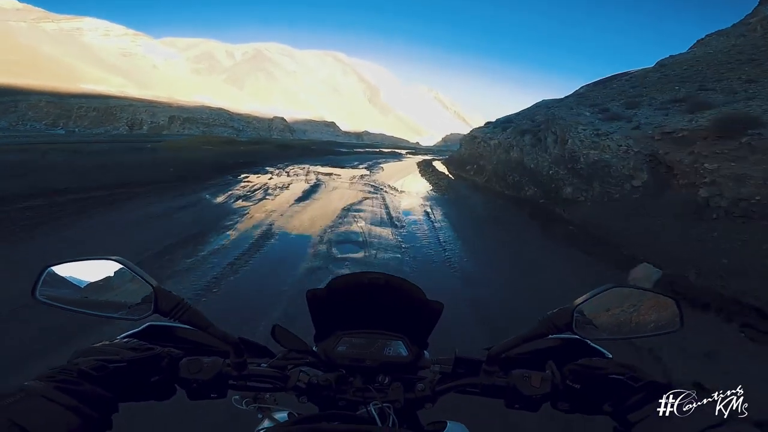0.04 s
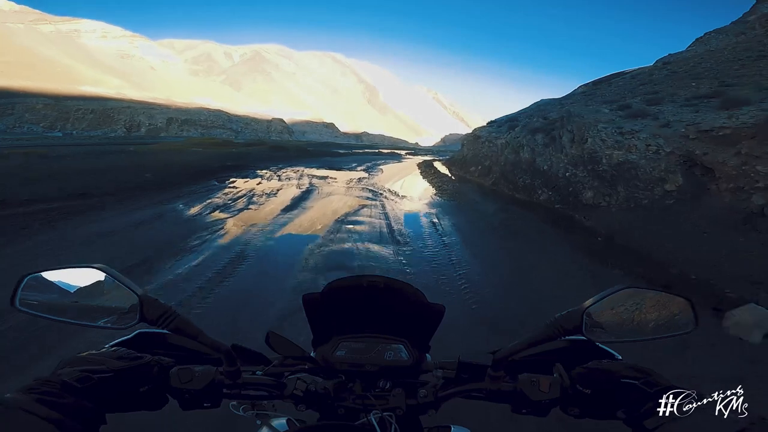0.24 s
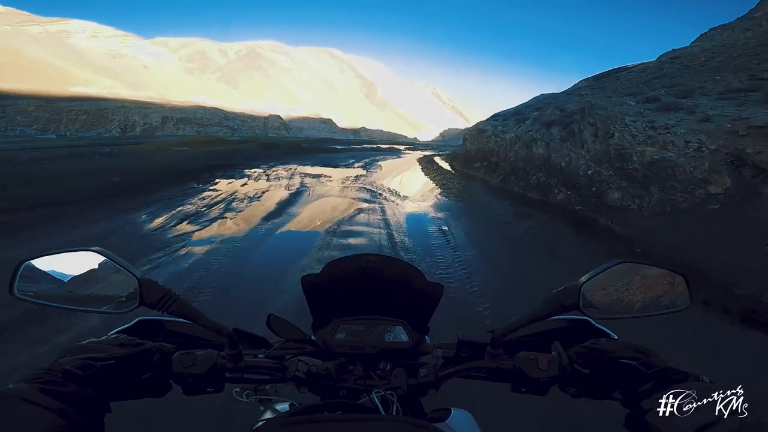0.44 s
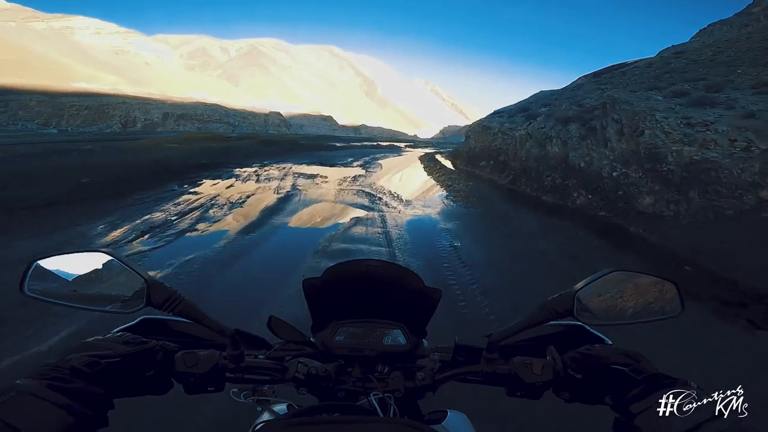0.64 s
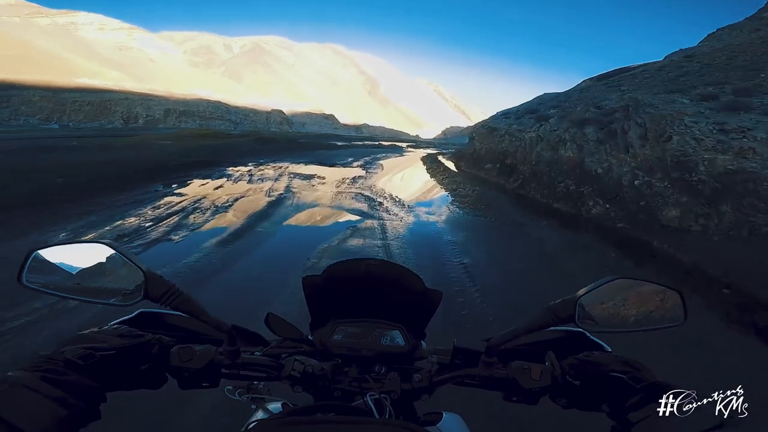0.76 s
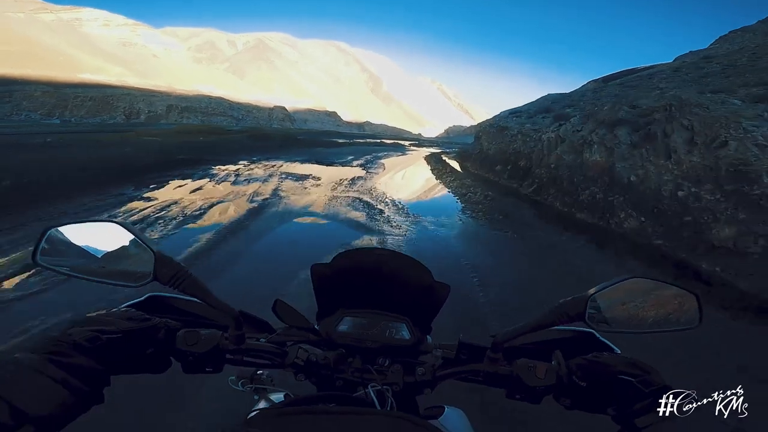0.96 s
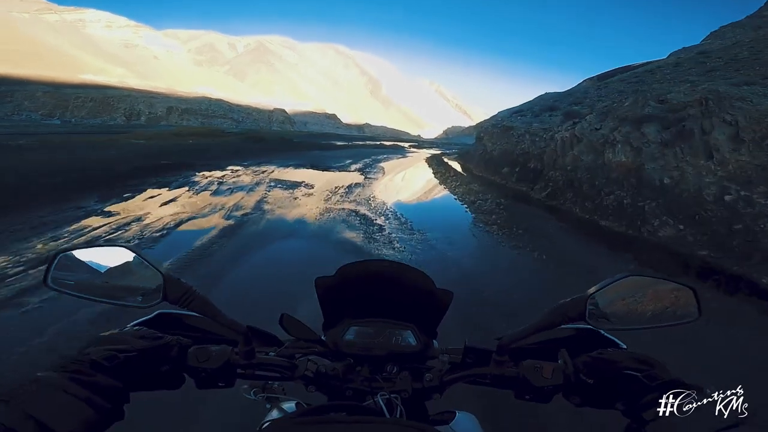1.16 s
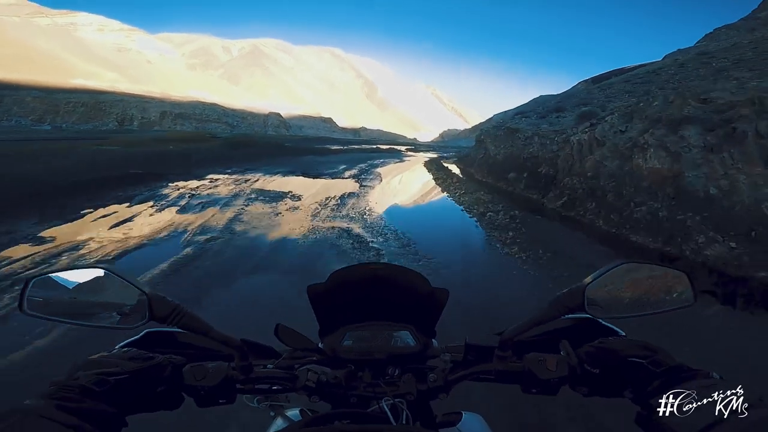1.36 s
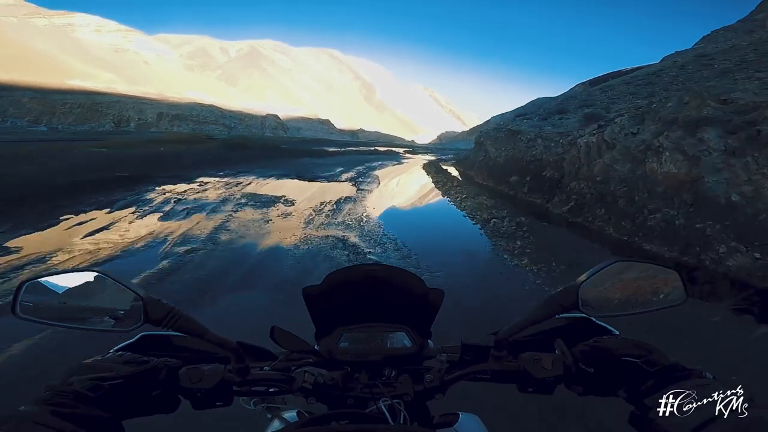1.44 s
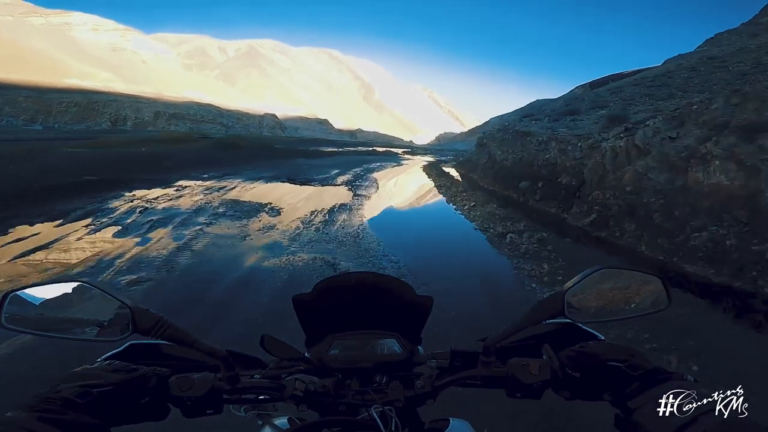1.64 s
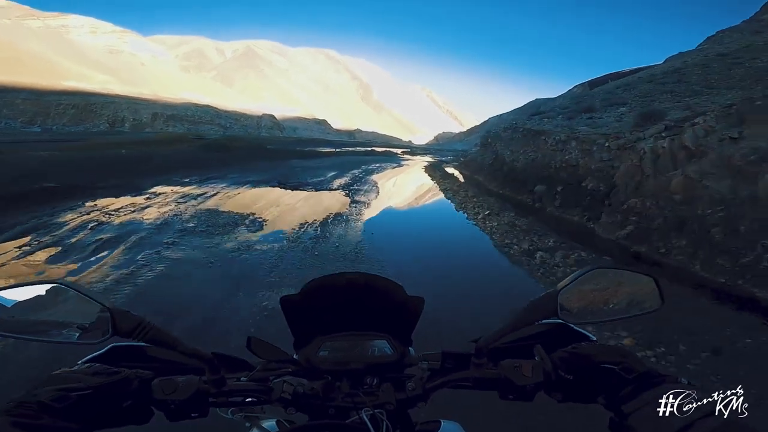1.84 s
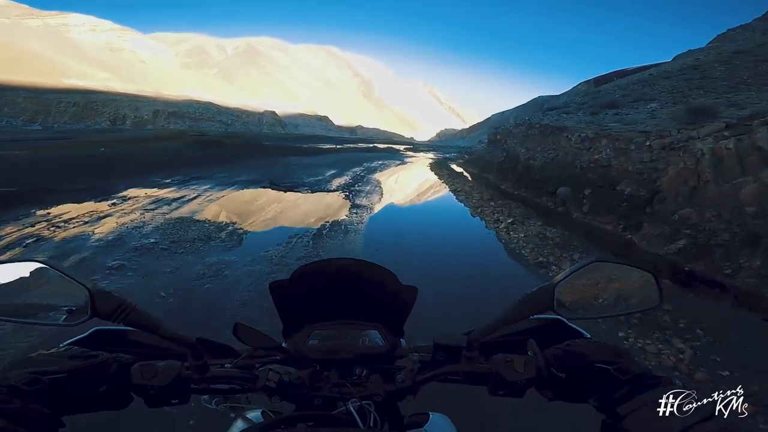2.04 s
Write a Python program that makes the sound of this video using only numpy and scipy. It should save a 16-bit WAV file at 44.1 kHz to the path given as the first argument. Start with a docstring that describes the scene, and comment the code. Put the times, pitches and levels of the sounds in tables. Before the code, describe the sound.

Low, throbbing motorcycle engine runs throughout, slightly stumbling early and then pulling harder; tyres swish and spatter on a wet track, bodywork clunks, and a loose part rattles at the end, recorded close on the bike outdoors.

```python
"""Throughout runs the low, muffled beat of a single-cylinder motorcycle at low revs, heard from the rider's seat.
It rolls over a wet, slushy track: each cycle is an exhaust push, an intake gulp, a gas rush and clatter.
These are harmonics, swelling noise and struck modes; a faint whine of wavering sines sits on top.
Bands of noise swish as tyres in slush, small rings spatter, and the bodywork hums and clunks as sines and modes.
Near the end a loose part knocks and rattles over a bump; wind rumble and hiss lie behind it all."""
import sys
import numpy as np
from scipy import signal
from scipy.fft import rfft, irfft
from scipy.io import wavfile

SR = 44100
rng = np.random.default_rng(int(sys.argv[2]) if len(sys.argv) > 2 else 0)


def transcribe(signal):
    """Save signal, clipped to [-1, 1], as a 16-bit WAV file at the path in sys.argv[1]."""
    frames = np.atleast_2d(signal).T
    limited = np.clip(frames, -1, 1)
    pcm = np.round(limited * 32767).astype(np.int16)
    wavfile.write(sys.argv[1], SR, pcm)


N = 92962
T = np.arange(N) / SR


def from_db(db):
    """Decibels to gain."""
    return 10 ** (np.asarray(db) / 20)


def rms_one(x):
    """Scale to unit rms."""
    return x / np.sqrt(np.mean(x ** 2) + 1e-20)


def in_time(rows):
    """A control curve at every sample, in straight lines between the rows."""
    return np.interp(T, *np.transpose(rows))


def filtered(x, hz, kind, order=2):
    """Butterworth filter."""
    return signal.sosfilt(signal.butter(order, hz, kind, fs=SR, output="sos"), x)


def slow_noise(hz):
    """Low-passed noise of unit rms; the filter's first second is dropped."""
    settled = filtered(rng.standard_normal(N + SR), hz, "low")[SR:]
    return rms_one(settled)


def coloured(spectrum):
    """Steady noise with the given spectrum, rms 1."""
    hz, db = np.transpose(spectrum)
    bin_hz = np.maximum(np.arange(N // 2 + 1) * SR / N, 1)
    gain = from_db(np.interp(np.log(bin_hz), np.log(hz), db))
    return rms_one(irfft(rfft(rng.standard_normal(N)) * gain, N))


def strike(times, db, hz, t60):
    """Clicks at the given times and levels ring one decaying mode."""
    clicks = np.bincount((np.asarray(times) * SR).astype(int), from_db(db), N)[:N]
    radius = from_db(-60 / (t60 * SR))  # decay per sample
    angle = 2 * np.pi * hz / SR
    feedback = [1, -2 * radius * np.cos(angle), radius * radius]
    return signal.lfilter([0, np.sin(angle)], feedback, clicks + 1e-18)


def strike_modes(hits, modes, alternate=False):
    """Every hit rings every mode; alternate flips the sign of each second mode."""
    s, db = np.transpose(hits)
    out = 0
    for k, (hz, level, t60) in enumerate(modes):
        sign = (-1) ** k if alternate else 1
        out = out + sign * strike(s, db + level, hz, t60)
    return out


def around(cycle, place):
    """Signed distance in cycles to the nearest pass of a place in the cycle."""
    return (cycle - place + .5) % 1 - .5


def bump(distance, width):
    """Bell curve of height 1."""
    return np.exp(-.5 * (distance / width) ** 2)


def spell(start, end, fade_s=0.014):
    """Fade in, hold, fade out."""
    return .5 * (np.tanh((T - start) / fade_s) - np.tanh((T - end) / fade_s))


def wind(level_db=-50.5, top_hz=35):
    """Wind rumble at the microphone: low-passed noise."""
    return from_db(level_db) * slow_noise(top_hz)


# Spectrum of the background hiss: (frequency [Hz], relative density [dB per Hz])
HISS_SPECTRUM = [(1000, 10), (4000, 3), (7000, 3), (12300, 2.5), (13300, -7.5), (15000, -13.5)]


def hiss(level_db=-72):
    """Steady background hiss: noise with a fixed spectrum."""
    return from_db(level_db) * coloured(HISS_SPECTRUM)


# Hums apart from the engine's pitch, likely tyres and panels:
# (start [s], end [s], start frequency [Hz], end frequency [Hz], level [dB])
HUMS = [(0.186, 0.538, 306.5, 292, -47), (0.527, 0.86, 296, 304.3, -47.5),
        (1.122, 1.406, 402.8, 407.6, -48), (1.19, 1.727, 667.5, 668, -56.5),
        (1.778, 2.2, 405.3, 406.4, -50)]


def hums(flutter_db=1.2, flutter_hz=12):
    """Passing hums: sines that glide slightly and flutter in level."""
    out = 0
    for start, end, start_hz, end_hz, db in HUMS:
        hz = np.interp(T, [start, end], [start_hz, end_hz])
        phase = 2 * np.pi * np.cumsum(hz) / SR
        gain = from_db(db + flutter_db * slow_noise(flutter_hz))
        out = out + np.sqrt(2) * gain * spell(start, end) * np.sin(phase)
    return out


# Tyres through deeper slush: (time [s], half length [s], centre frequency [Hz], level [dB])
SPLASHES = [(0.865, 0.029, 540, -43), (1.195, .013, 1920, -60.5), (1.217, 0.016, 670, -47),
            (1.336, 0.018, 329, -43), (1.534, 0.012, 369, -45), (1.753, 0.011, 308, -40)]


def slush(width=1.19):
    """Short soft swishes from the tyres: band noise, its edges a ratio of width either side of the centre."""
    out = 0
    for s, half_length, hz, db in SPLASHES:
        spray = rms_one(filtered(rng.standard_normal(N), [hz / width, hz * width], "band", order=3))
        out = out + spray * from_db(db) * bump(T - s, half_length)
    return out


SPATTER_PER_S, SPATTER_DB, SPATTER_SPREAD_DB = 120, -65.5, 4.5
SPATTER_LOW_HZ, SPATTER_HIGH_HZ, SPATTER_CYCLES = 1000, 2400, 7.3  # cycles until a ring is 60 dB down


def spatter(count=12):
    """Drops of slush hit the mudguard at random, each a short ring; higher ones are weaker."""
    out = 0
    for hz in np.geomspace(SPATTER_LOW_HZ, SPATTER_HIGH_HZ, count):
        born = rng.random(N) < SPATTER_PER_S / count / SR
        size_db = SPATTER_SPREAD_DB * np.minimum(rng.exponential(1, N), 3)[born]
        out = out + strike(T[born], size_db, hz, SPATTER_CYCLES / hz) / hz ** 2
    return from_db(SPATTER_DB) * rms_one(filtered(out, SPATTER_HIGH_HZ, "low", order=4))


# Jolts of the bike: (time [s], relative level [dB])
CLUNKS = [(.624, 4), (.872, 0), (1.217, 0), (1.394, 4.5), (1.704, -3), (1.865, -1), (1.922, 0.5),
          (2.018, -4)]
# Bodywork modes they ring: (frequency [Hz], level [dB], t60 [s])
CLUNK_MODES = [(636, -39, 0.044), (780, -40, 0.028)]


def clunks():
    """Jolts from the rough track ring dull clunks in the bodywork."""
    return strike_modes(CLUNKS, CLUNK_MODES, alternate=True)


# The knock and its rebound: (time [s], relative level [dB])
KNOCKS = [(2.0339, -1.5), (2.0368, -17)]
# Modes of the knocked part: (frequency [Hz], level before filtering [dB], t60 [s])
PANEL = [(630, -20.5, 0.019), (906, -18.5, 0.011), (1390, -24, 0.0092), (2160, -30.5, 0.0092)]


def knock(bottom_hz=400, top_hz=2500):
    """A loose part knocks once and rebounds, ringing its modes within a limited band."""
    rings = strike_modes(KNOCKS, PANEL, alternate=True)
    return filtered(filtered(rings, bottom_hz, "high"), top_hz, "low", order=4)


# Sharpest contacts of the rattle: (time [s], level before the mode levels and filter [dB])
RATTLE_HITS = [(2.05, -52), (2.055, -54), (2.065, -53)]
# Modes of the loose bits: (frequency [Hz], relative level [dB], t60 [s])
RATTLE_MODES = [(1100, -5, 0.0045), (1420, -2, 0.0077), (1700, 5, 0.011), (1870, -1, 0.0052),
                (2250, -6, 0.006)]
# Band edges of the rattle: (high-pass on the patter [Hz], low-pass on everything [Hz])
RATTLE_BAND_HZ = [780, 2100]
RATTLE_START_S, RATTLE_T60_S, RATTLE_PER_S = 2.041, 0.33, 2700
RATTLE_DB = -50.5  # at its start, before the low-pass


def rattle(spread_db=2):
    """A dense, dying patter of small random contacts follows the knock, with a few sharper hits."""
    contacts = 0
    for hz, level, t60 in RATTLE_MODES:
        born = rng.random(N) < RATTLE_PER_S / len(RATTLE_MODES) / SR
        db = level + spread_db * rng.standard_normal(N)[born]
        contacts = contacts + strike(T[born], db, hz, t60)
    age = np.maximum(T - RATTLE_START_S, 0)
    fall_db = -60 * age / RATTLE_T60_S
    patter = rms_one(filtered(contacts, RATTLE_BAND_HZ[0], "high"))
    patter = patter * from_db(RATTLE_DB + fall_db) * (age > 0)
    hits = strike_modes(RATTLE_HITS, RATTLE_MODES)
    return filtered(patter + hits, RATTLE_BAND_HZ[1], "low", order=6)


# Body hum and whine: (mean frequency [Hz], mean level [dB])
WHINE = [(408.5, -51.5), (517.5, -55.5), (1035, -64)]


def whine(flutter_db=2.0, wander=.004, waver_hz=12):
    """Body hum and a faint whine, likely the fuel pump: sines wavering in level and, by a share, in pitch."""
    out = 0
    for hz, db in WHINE:
        phase = 2 * np.pi * hz * np.cumsum(1 + wander * slow_noise(waver_hz)) / SR
        gain = from_db(db + flutter_db * slow_noise(waver_hz))
        out = out + np.sqrt(2) * gain * np.sin(phase)
    return out


# Sharper ticks from the engine: (time [s], relative level [dB])
TICKS = [(0.187, 5), (0.228, 2.5), (.261, 5), (0.303, 5.5), (.38, 6), (.665, -10), (1.189, 3), (1.71, 1)]
# Modes they ring: (frequency [Hz], level [dB], t60 [s])
TICK_MODES = [(1352, -54.5, 0.044), (1477, -53.5, 0.028)]


def ticks():
    """Now and then the engine ticks more sharply, ringing two close modes."""
    return strike_modes(TICKS, TICK_MODES, alternate=True)


# Valve and piston contacts: (place in the cycle [cycles], relative level [dB])
CONTACTS = [(0.064, -2), (0.171, -6), (.3, -13.5), (0.602, -2)]
# Modes of the engine case and bodywork: (frequency [Hz], level [dB], t60 [s])
CASE = [(416, -47, 0.039), (480, -70.5, 0.011), (639, -54, 0.092), (700, -57, 0.0042), (990, -69, 0.023),
        (1370, -54.5, 0.024), (1663, -70.5, 0.03)]


def clatter(cycle, jitter=.012, spread_db=3):
    """Valve and piston contacts ring the case, a little differently each time (jitter in cycles)."""
    cycles = range(int(cycle[-1]) + 1)
    place, db = np.transpose([(k + at, db) for k in cycles for at, db in CONTACTS])
    s = np.interp(place + jitter * rng.standard_normal(len(place)), cycle, T)
    out = 0
    for hz, level, t60 in CASE:
        out = out + strike(s, db + level + spread_db * rng.standard_normal(len(s)), hz, t60)
    return out


# Spectrum of the gas rush: (frequency [Hz], relative density [dB per Hz])
RUSH_SPECTRUM = [(60, -8), (130, -7), (200, -5), (260, -2), (330, 0), (410, 0.5), (500, -1.5), (590, -6.5),
                 (760, -6.5), (870, -10), (1100, -14), (1290, -19.5), (1370, -19.5), (1520, -18),
                 (1610, -27), (1980, -30), (2120, -28.5), (2330, -35.5), (2700, -39.5), (3500, -48.5),
                 (6000, -54.5)]
# Level of the rush: (time [s], level [dB])
RUSH_LEVEL = [(0, -42), (.5, -42.5), (.85, -41), (1.1, -41.5), (1.6, -42.5), (1.9, -40.5), (2.1, -40)]


def rush(cycle, at=.3, width=.13, swell_db=2.5):
    """Gas noise swells once in every cycle (place and width in cycles)."""
    swell = bump(around(cycle, at), width)
    gas = rms_one(coloured(RUSH_SPECTRUM) * from_db(swell_db * swell))
    return from_db(in_time(RUSH_LEVEL)) * gas


# Harder firings as the engine stumbles: (time [s], level [dB])
HARD_FIRINGS = [(0.255, -23), (.336, -30.5), (.416, -24.5)]


def stumble(pipe_hz=99, pipe_t60_s=0.028):
    """Hard firings boom in the exhaust pipe, a short low mode."""
    s, db = np.transpose(HARD_FIRINGS)
    return strike(s, db, pipe_hz, pipe_t60_s)


# Harmonics that drone for a while: (multiple of the firing rate, start [s], end [s], level [dB])
DRONES = [(9, 0.31, 0.64, -51.5), (7, 0.72, 0.94, -47), (4, 0.8, 1.1, -47.5), (6, 1.02, 1.48, -54.5),
          (7, 2.1, 2.7, -37.5)]


def drone(order):
    """Extra gain of one harmonic while some part buzzes along with it."""
    gain = 0
    for k, start, end, db in DRONES:
        if k == order:
            gain = gain + from_db(db) * spell(start, end)
    return gain


# Engine speed: (time [s], firing rate [per second])
SPEED = [(0.0, 24.25), (0.16, 26.1), (0.24, 24.98), (0.45, 25.24), (0.67, 24.75), (0.87, 27.15),
         (0.97, 23.07), (1.15, 25.53), (1.26, 24.74), (1.36, 24.92), (1.46, 23.9), (1.6, 25.1),
         (1.72, 24.23), (1.84, 25.7), (1.93, 25.12), (2.02, 26.49), (2.1, 25.02)]


def engine_cycle(first_firing_s=.02):
    """Engine cycles counted from the first firing: the running sum of the firing rate."""
    cycle = np.cumsum(in_time(SPEED)) / SR
    return cycle - np.interp(first_firing_s, T, cycle)


# Engine load: (time [s], load [0 coasting to 1 pulling])
LOAD = [(0, 0.04), (.3, 0.025), (.55, 0.66), (.8, 0.41), (1.0, 0.53), (1.5, 0.84), (1.8, 0.98), (2.1, 0.89)]
# Engine harmonics: (multiple of the firing rate, level coasting [dB], level pulling [dB])
ORDERS = [(1, -42.5, -42.5), (2, -46.5, -46.5), (3, -47, -60.5), (4, -53, -45.5), (5, -52, -43),
          (6, -62, -56), (7, -52.5, -47), (8, -59.5, -52.5), (9, -51, -51.5), (10, -65, -59.5),
          (11, -57, -74), (12, -79, -59), (13, -54.5, -69), (14, -66.5, -57.5), (15, -59.5, -57),
          (16, -51, -57), (17, -68, -56.5), (18, -68, -54.5), (19, -65, -61.5), (22, -79, -55.5),
          (25, -63.5, -60.5), (27, -61, -59.5), (31, -58, -59.5)]
# places and widths in cycles, depths against the push
PUSH_WIDTH = 0.02544
GULP_AT, GULP_WIDTH, GULP_DEPTH = .227, .154, 1.13
SUCTION_AT, SUCTION_WIDTH, SUCTION_DEPTH = .264, 0.0268, 0.88  # brief peak in mid-stroke
UNEVEN_DB, UNEVEN_HZ = .7, 5.3  # slow level spread of each harmonic


def engine_note(cycle):
    """Harmonics timed by the exhaust push and the intake gulp; load shifts their balance."""
    turn = np.arange(256) / 256
    push = bump(around(turn, 0), PUSH_WIDTH)
    gulp = np.exp(-(around(turn, GULP_AT) / GULP_WIDTH) ** 8)  # flat-topped
    suction = bump(around(turn, SUCTION_AT), SUCTION_WIDTH)
    # the pressure shape gives only the phases; the table gives the levels
    timing = np.angle(rfft(push - GULP_DEPTH * gulp - SUCTION_DEPTH * suction))
    load = in_time(LOAD)
    out = 0
    for order, coasting, pulling in ORDERS:
        gain = np.hypot(from_db(coasting + load * (pulling - coasting)), drone(order))
        uneven = from_db(UNEVEN_DB * slow_noise(UNEVEN_HZ))
        out = out + np.sqrt(2) * gain * uneven * np.cos(2 * np.pi * order * cycle + timing[order])
    return out


def scene():
    """Wind and hiss, track and bodywork, then the engine, summed at one microphone."""
    cycle = engine_cycle()
    air = wind() + hiss()
    track = hums() + slush() + spatter() + clunks() + knock() + rattle()
    engine = whine() + ticks() + clatter(cycle) + rush(cycle) + stumble() + engine_note(cycle)
    return (air + track + engine)[None]


def record(dry, cutoff_hz=15200):
    """A steep elliptic low-pass cuts the top."""
    return signal.sosfilt(signal.ellip(10, .1, 80, cutoff_hz, fs=SR, output="sos"), dry)


dry = scene()
out = record(dry)
transcribe(out)
```